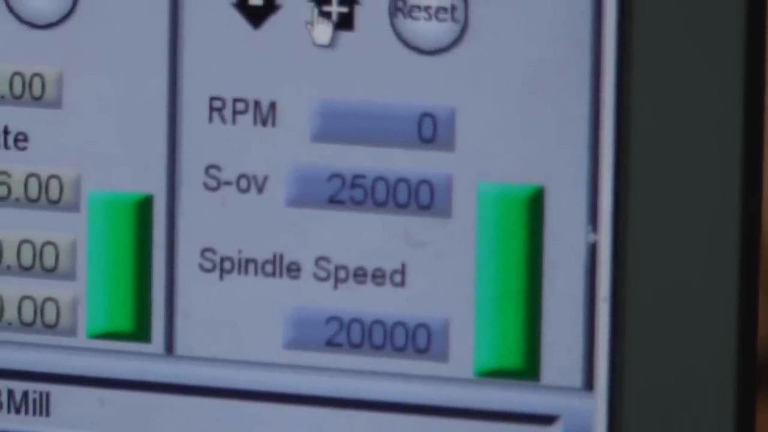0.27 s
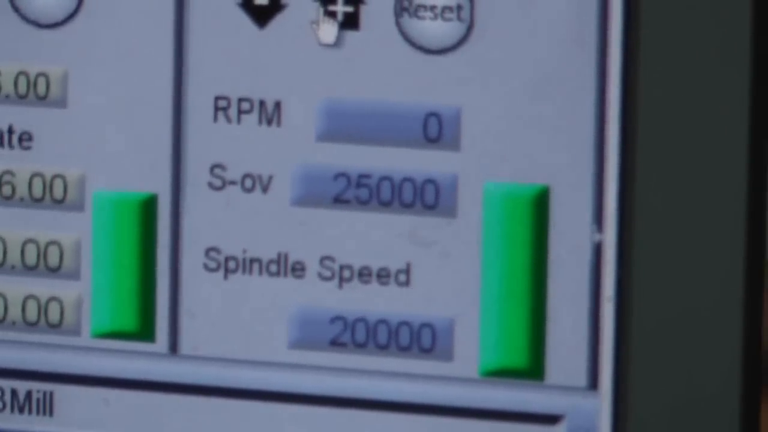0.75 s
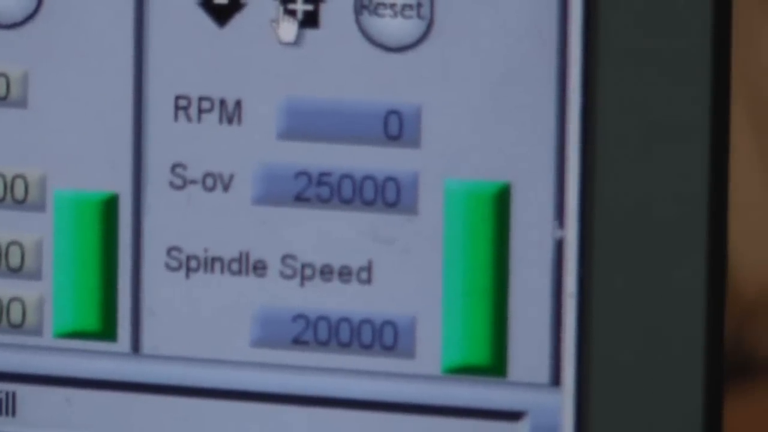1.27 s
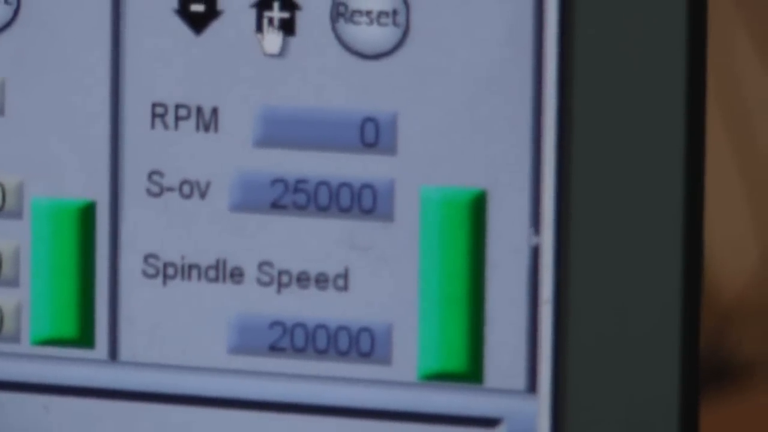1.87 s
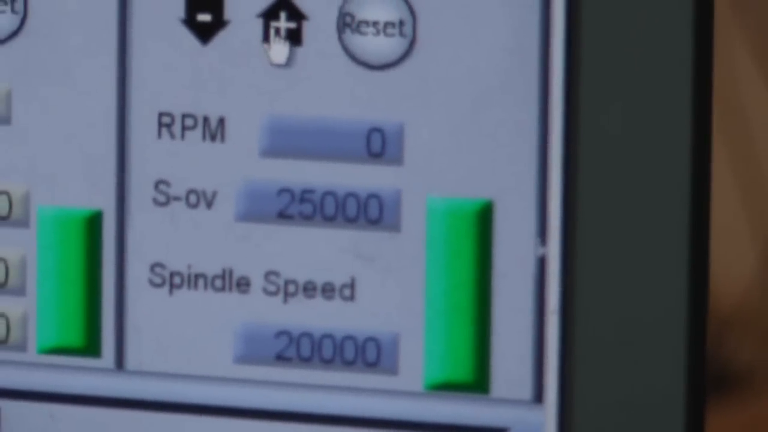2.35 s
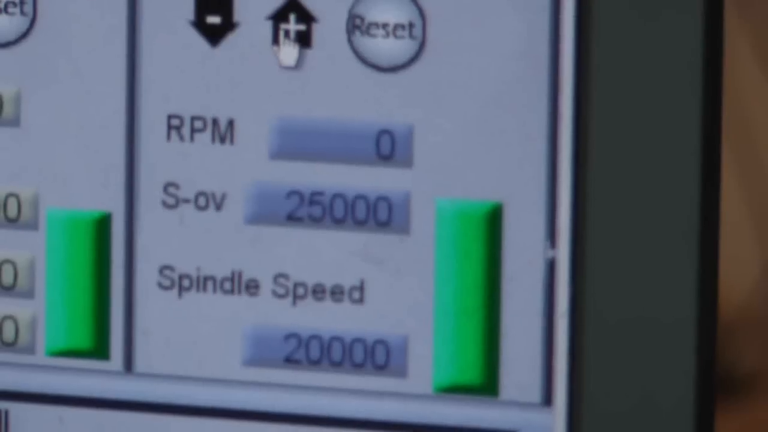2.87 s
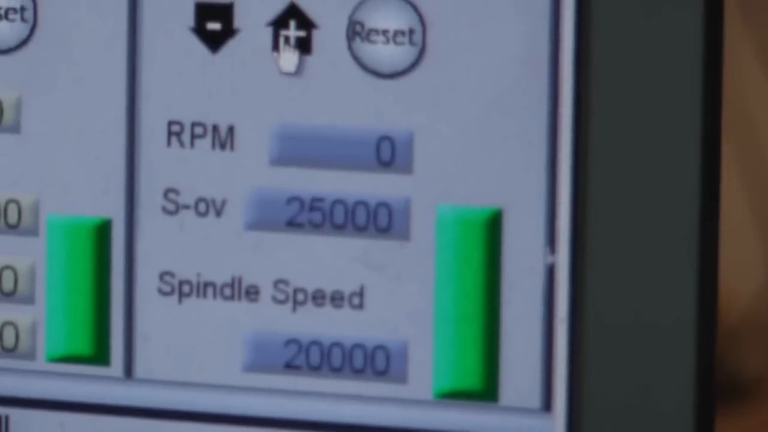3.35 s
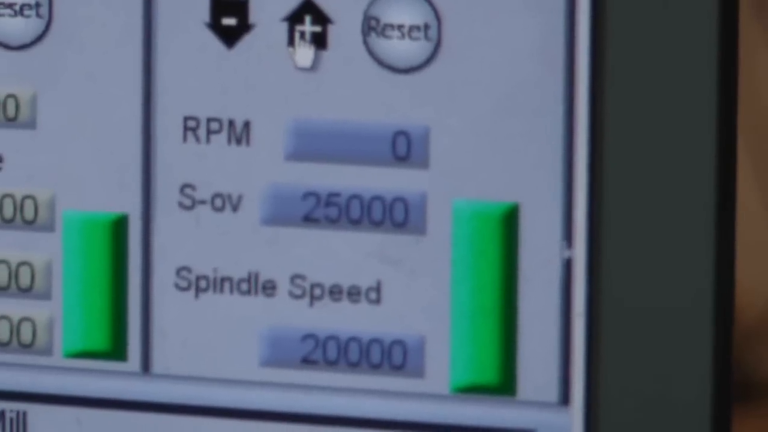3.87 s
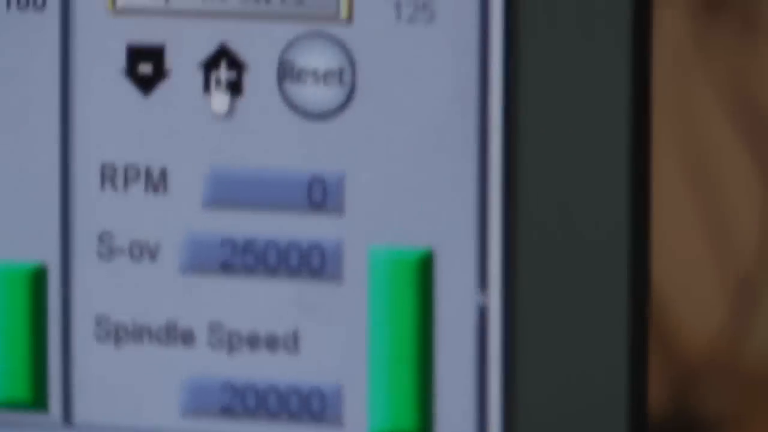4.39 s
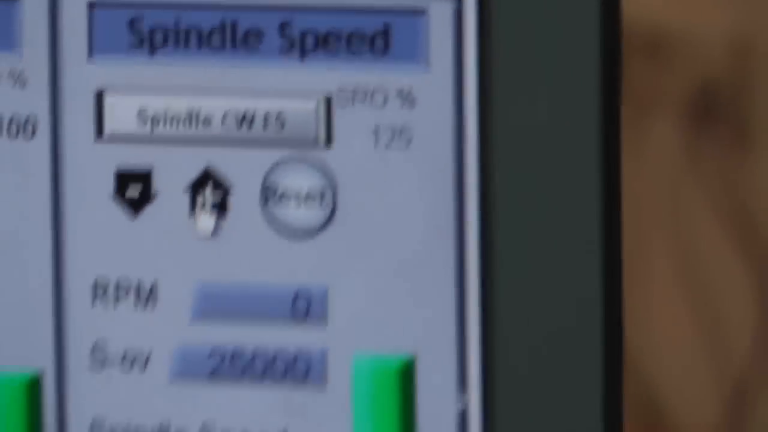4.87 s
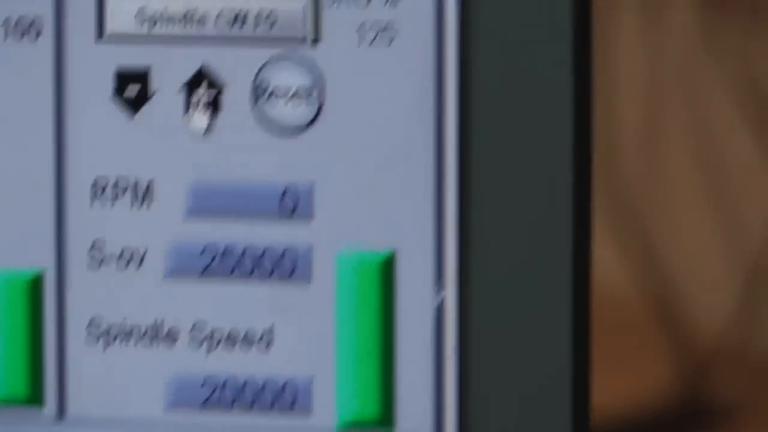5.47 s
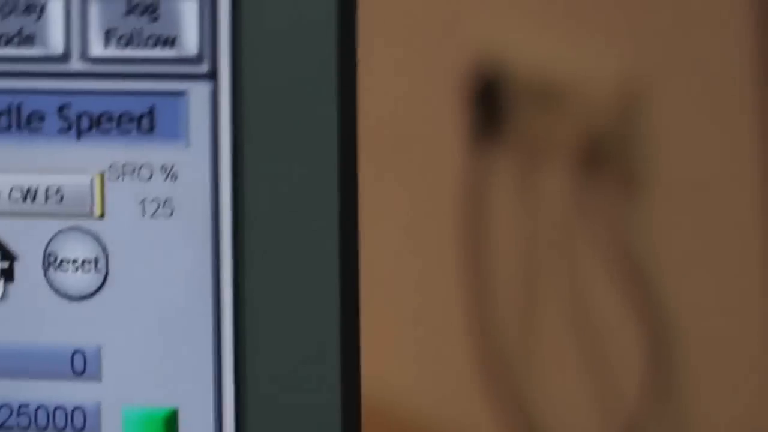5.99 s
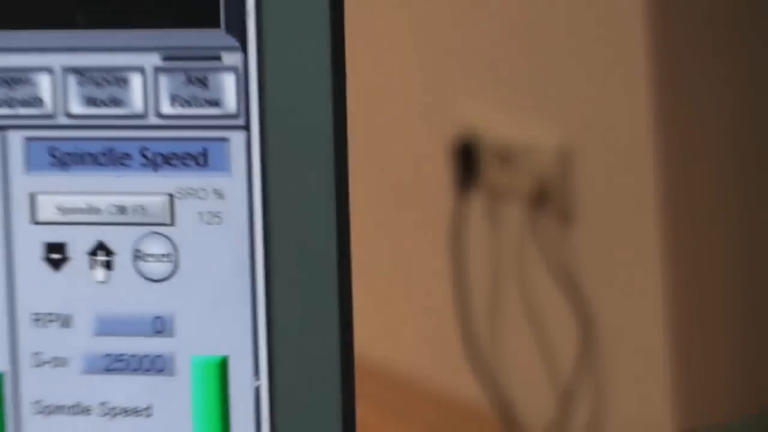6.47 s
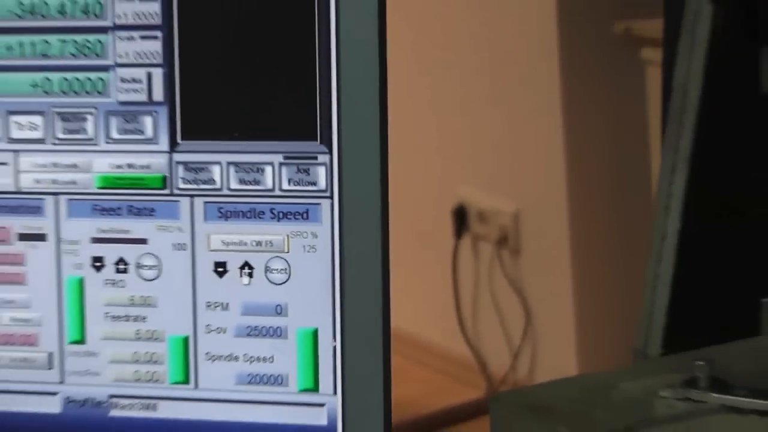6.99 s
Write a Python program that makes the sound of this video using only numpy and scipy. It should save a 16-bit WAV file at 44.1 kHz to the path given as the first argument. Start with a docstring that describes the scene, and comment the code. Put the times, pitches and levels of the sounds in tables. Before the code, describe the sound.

Continuous spindle motor noise in an indoor workshop: a clear whine and its octave rise together, joined by shimmering electrical and bearing tones and a sharp rushing hiss. The climb ends shortly before halfway, and the pitch then stays constant while the octave pulses softly and the balance shifts as the hand-held microphone slowly turns. Faint hum and rumble lie underneath; nothing starts or stops.

```python
"""Router spindle idling in a workshop

The whine climbs at a steady rate as the inverter ramps the magnetic field up, then holds top speed.
Sines at multiples of the shaft, field and ball-bearing rates ride on noise shaped by housing resonances.
Mains hum and a low rumble lie below. A hand-held camera turns slowly, which level and left-right curves
imitate; its gain control ducks everything while the whine swells."""
import sys
import numpy as np
from scipy.fft import rfft, irfft, next_fast_len
from scipy.io import wavfile
from scipy.ndimage import uniform_filter1d, map_coordinates

SR = 44100
rng = np.random.default_rng(int(sys.argv[2]) if len(sys.argv) > 2 else 0)


def transcribe(u):
    """Save the signal u as a 16-bit wav file named by the first command-line argument.

    u: samples, shape (n,) or (channels, n), limited to [-1, 1]; the rate is SR.
    q: integer samples, one column per channel.
    """
    v = np.clip(np.atleast_2d(u).T, -1, 1)
    q = np.round(v * 32767).astype(np.int16)
    wavfile.write(sys.argv[1], SR, q)


N = 318842
TIME = np.arange(N) / SR
STEP = 32  # samples between points of slow curves
COARSE = TIME[::STEP]

# All table levels are relative: trims, wavering and the gain control come on top.
# Spindle speed over time: start_s, field_hz, rotor_slip_hz, ball_passes (per shaft turn)
SPEED_CURVE = [(0, 334.1, .99, 4.0915), (2.5, 384.1, .99, 4.099), (3.29, 399.85, .99, 4.099),
               (3.4, 399.85, .35, 4.099), (3.55, 399.85, .63, 4.0987), (7.23, 399.85, .63, 4.0987)]


def amp(db):
    """Gain of a level in dB."""
    return 10 ** (np.asarray(db) / 20)


def unit(x):
    """Scale a sound to an rms (average strength) of 1."""
    return x / np.sqrt(np.mean(x ** 2))


def along(points, hz):
    """Read a (Hz, value) curve on a logarithmic frequency axis."""
    point_hz, value = np.transpose(points)
    return np.interp(np.log(hz + 1), np.log(point_hz + 1), value)


def curves(rows):
    """One value per sample for each column after the time."""
    time_s, *columns = np.transpose(rows)
    return [np.interp(TIME, time_s, column) for column in columns]


def fine(rows):
    """Bring coarse curves to one value per sample."""
    return np.array([np.interp(TIME, COARSE, row) for row in rows])


def wobble(rate, count=1):
    """Smooth random curves on the coarse time axis, with rate random knots a second."""
    knots = rng.standard_normal((count, int(1000 * N / SR)))
    needed = int(rate * N / SR) + 4
    return np.array([map_coordinates(row[:needed], [COARSE * rate]) for row in knots])


def filtered(x, response):
    """Multiply the spectrum of a sound by a response that depends on frequency."""
    size = next_fast_len(N + SR // 2)
    hz = np.fft.rfftfreq(size, 1 / SR)
    return irfft(rfft(x, size) * response(hz), size)[..., :N]


def panned(x, pan_db):
    """Two channels, the left one louder by pan_db."""
    return x * amp(np.array([pan_db / 2, -pan_db / 2]))


def rush(gain, alike, gate=1):
    """Stereo noise of rms 1: level follows gate, then gain colors it; alike sets left-right likeness."""
    def spread(hz):
        return np.arccos(np.clip(along(alike, hz), -1, 1)) / 2

    def mid_side_gain(hz):
        return gain(hz) * [np.cos(spread(hz)), np.sin(spread(hz))]

    pair = gate * rng.standard_normal((2, N))
    mid, side = filtered(pair, mid_side_gain)
    return unit(np.array([mid + side, mid - side]))


def tone(angle, db, waver_db, blur_db, blur_hz, apart):
    """A sine of wavering level with a skirt of narrow noise; level and phase drift apart left and right."""
    slow, lean, lead = wobble(4, count=3)
    a, b, c, d = amp(blur_db) * wobble(blur_hz, count=4)
    left_skirt = a + 1j * b
    skirt = np.array([left_skirt, 1.42 * left_skirt + .5 * (c + 1j * d)])
    sides = np.array([[1], [-1]])
    level = amp(db + waver_db * (slow + apart * sides * lean))
    size = level * (np.exp(1j * apart * sides * lead) + skirt)
    return np.sqrt(2) * np.real(fine(size) * np.exp(1j * angle))


def angles():
    """Angles of field, shaft and ball passes; the rotor slips behind the field, more while it gains speed."""
    field_hz, slip_hz, ball_passes = curves(SPEED_CURVE)
    shaft_hz = field_hz - slip_hz
    rates_hz = [field_hz, shaft_hz, ball_passes * shaft_hz]
    return 2 * np.pi * np.cumsum(rates_hz, axis=1) / SR


def whine(field, shaft):
    """Unbalance sounds once a turn; twice a turn the shaft tone beats against the field's magnetic pull."""
    # Once-a-turn tone, sweeping through the room's standing waves, then following the camera's turn:
    # start_s, level_db, left_right_db
    turn_curve = [(0.03, -34, -3), (0.13, -39, -1), (0.17, -54, -2.5), (0.23, -38.5, -7.5),
                  (0.35, -33.5, -3), (0.57, -25.5, -6.5), (0.68, -28.5, -4.5), (0.83, -22.5, -1),
                  (0.93, -29, -4), (1.13, -22, -2.0), (1.28, -27, -1.5), (1.46, -28.5, -6.0),
                  (1.54, -25, -2.5), (1.94, -26.5, -1.5), (2.28, -26, -9.0), (2.42, -32, -1.0),
                  (2.48, -49, 4), (2.52, -42, -15), (2.6, -33.5, -10.5), (2.88, -34.5, -11.5),
                  (3.02, -33.5, -6), (3.18, -26, -5.5), (3.47, -30, -4.5), (3.87, -29.5, -4.0),
                  (5.29, -30.5, -3.5), (5.56, -27.5, -1.0), (5.98, -25, -1.5), (6.36, -22.5, -2),
                  (6.88, -22.5, -2.5), (7.18, -22, -3)]
    # Twice-a-turn tone: start_s, shaft_level_db, left_right_db, field_share (field over shaft tone, 0-1)
    octave_curve = [(0, -45, -2, 0.8), (.25, -50, -19, 0.6), (.42, -38.5, 0, 0.5), (.9, -40, -6, .7),
                    (1.3, -34.5, -4, 0.3), (1.55, -33.5, 5, 0.25), (1.85, -27.5, 1, .6),
                    (2.1, -36, 5, 0.56), (2.3, -41.5, -11, .4), (2.6, -34, 3, 0.54),
                    (2.95, -33, -18.5, 0.94), (3.15, -32.5, -9, 0.6), (3.35, -21, -5, 0.2),
                    (3.7, -24, -4.5, 0.53), (5.2, -22, -3, .45), (5.8, -20, -2, .45),
                    (6.3, -22.5, .5, 0.56), (7.23, -21, 0, 0.17)]
    beat_lead = 0.23  # lead of the field tone at the start, in turns
    low_db, low_pan_db = curves(turn_curve)
    octave_db, octave_pan_db, share = curves(octave_curve)
    # Two tones close in pitch act as one whose level and phase follow the beat
    beat = 1 + share * np.exp(1j * (2 * (field - shaft) + 2 * np.pi * beat_lead))
    octave_db = octave_db + 20 * np.log10(np.abs(beat) + 1e-3)
    octave_angle = 2 * shaft + np.angle(beat)
    low = tone(shaft, low_db[::STEP], waver_db=0.14, blur_db=-31.5, blur_hz=70.8, apart=0.28)
    octave = tone(octave_angle, octave_db[::STEP], waver_db=1.37, blur_db=-30.5, blur_hz=89.9, apart=0.14)
    return panned(low, low_pan_db) + panned(octave, octave_pan_db)


def overtones(field, shaft, passes):
    """Thin lines, each wavering on its own as wall echoes make it; low and high ones differ in skirt."""
    # Multiples of shaft speed, .409 being the ball cage and other broken ones likely bearing tones:
    # shaft_multiple, low_speed_db, middle_speed_db, top_speed_db
    shaft_lines = [(0.409, -55, -59, -65), (2.665, -52, -60, -68), (2.96, -46, -56, -66),
                   (3, -39, -43, -42), (3.667, -66, -54, -49), (4, -41, -39, -41), (4.77, -49, -63, -68),
                   (5, -45, -53, -53), (6, -57, -59, -53), (7, -59, -58, -55), (9, -57, -49, -57),
                   (16, -38, -44, -49), (18, -48, -51, -50), (31.5, -61, -51, -53), (34, -49, -50, -58)]
    # Inverter tones: field_multiple, low_speed_db, middle_speed_db, top_speed_db
    field_lines = [(11, -36, -41, -43), (13, -43, -42, -42), (14, -47, -45, -47), (15, -50, -48, -53),
                   (16, -50, -55, -56), (17, -46, -55, -53), (19, -66, -50, -57), (20, -47, -46, -58),
                   (22, -41, -50, -52), (23, -48, -56, -58), (24, -47, -52, -54), (25, -54, -47, -57),
                   (26, -43, -45, -50), (28, -42, -60, -57), (29, -58, -55, -56), (32, -47, -63, -56),
                   (35, -50, -54, -63), (37, -57, -55, -68), (39, -53, -63, -68), (41, -54, -63, -70),
                   (46, -59, -70, -70)]
    # Balls passing a spot on the race, with sidebands a turn apart:
    # ball_passes, shaft_turns, low_speed_db, middle_speed_db, top_speed_db
    ball_lines = [(1, -2, -52, -49, -48), (1, -1, -48, -51, -52), (1, 0, -47, -43, -39),
                  (1, 1, -44, -51, -65), (1, 2, -57, -63, -53), (1, 3, -71, -57, -48),
                  (-1, 7, -40, -50, -60), (-1, 8, -49, -46, -51), (-1, 9, -41, -50, -60),
                  (2, 0, -48, -34, -40), (2, 1, -44, -47, -58), (2, 2, -41, -46, -56),
                  (-2, 18, -51, -48, -47), (-2, 19, -48, -45, -53), (3, 0, -39, -37, -46),
                  (3, -1, -46, -50, -47), (3, 1, -53, -48, -50), (5, 0, -45, -45, -44),
                  (5, -1, -57, -57, -51), (5, 1, -49, -50, -64), (6, 0, -48, -51, -54),
                  (8, 0, -66, -45, -51)]
    # Sixteen rotor bars passing, shifted by the field:
    # field_multiple, low_speed_db, middle_speed_db, top_speed_db
    bar_lines = [(3, -64, -52, -59), (4, -54, -61, -66), (6, -58, -53, -57), (11, -53, -55, -64),
                 (12, -46, -61, -66), (15, -57, -53, -56)]
    # Field speeds for the three level columns: low_hz, middle_hz, top_hz
    speeds_hz = [343, 376, 399.5]
    # Housing resonances that lift a line crossing them: center_hz, width_hz, lift_db
    singing = [(4385, 87, 7.5), (5674, 78, 3.5), (7800, 190, 5.5)]

    lines = [(k * shaft, db) for k, *db in shaft_lines]
    lines += [(k * field, db) for k, *db in field_lines]
    lines += [(balls * passes + turns * shaft, db) for balls, turns, *db in ball_lines]
    lines += [(16 * shaft + k * field, db) for k, *db in bar_lines]
    low, high = np.zeros((2, 2, N))
    field_hz = curves(SPEED_CURVE)[0][::STEP]
    depth = np.where(field_hz < speeds_hz[-1], 2.76, 1)  # deeper wavering below top speed
    for angle, db in lines:
        hz = field_hz * angle[-1] / field[-1]
        lift_db = sum(top_db * np.exp(-.5 * ((hz - center) / width) ** 2) for center, width, top_db in singing)
        level_db = np.interp(field_hz, speeds_hz, db) + lift_db
        angle = angle + 2 * np.pi * rng.random()  # random starting phase
        if angle[-1] < 5.5 * shaft[-1]:
            low += tone(angle, level_db + 0.25, waver_db=1.17 * depth, blur_db=-16, blur_hz=99.7, apart=0.42)
        else:
            high += tone(angle, level_db - 0.3, waver_db=1.07 * depth, blur_db=-12.5, blur_hz=30.03, apart=0.054)
    return panned(low, np.full(N, -3.5)) + panned(high, np.full(N, -1.1))


def hiss(shaft):
    """Rolling bearing noise, pulsing once a turn and fluttering at random, rings in the housing."""
    # Bearing hiss over time: start_s, level_db, left_right_db, treble_db
    hiss_curve = [(0, -28.5, -0.5, -7), (2.78, -28, -1, -6), (3.6, -30, -0.5, -5.5), (5.1, -30, -0.5, -4.5),
                  (5.8, -30.5, -0.5, -5), (6.5, -30, -1, -3.5), (7.23, -30.5, -1, -3.5)]
    # Housing resonances: center_hz, width_hz, level_db
    housing = [(930, 38, -7), (1445, 174, -5), (1673, 210, -1.5), (3097, 303, -1.5), (3542, 140, 0.5),
               (3880, 340, -0.5), (4350, 230, 0), (4600, 130, -0.5), (5330, 350, -14), (8000, 590, -3),
               (9520, 600, -7), (11900, 1860, -5.5)]
    # Broad hiss between the resonances: frequency_hz, level_db (per Hz)
    broad = [(300, -36), (400, -18.5), (700, -15), (1050, -14.5), (1270, -40), (1900, -18), (2250, -17),
             (2550, -17.5), (3000, -2.5), (6000, -12.5), (13000, -12), (15700, -17)]
    # How alike left and right are: frequency_hz, likeness (1 = the same)
    likeness = [(300, 0.59), (640, 0.68), (1400, 0.92), (2500, 0.82), (3500, 0.96), (8000, 1),
                (11000, 0.96), (15000, 0.55)]
    # Left-right balance by pitch: frequency_hz, left_right_db
    balance = [(400, -6.5), (1400, 1), (3500, -0.8), (8000, 2.3), (13000, -1.5)]

    def modes(hz):
        return sum(amp(db) ** 2 * (hz * width) ** 2 / ((center * center - hz * hz) ** 2 + (hz * width) ** 2)
                   for center, width, db in housing)

    def gain(hz):
        # Squared mode curve: narrow resonances standing out of the hiss
        return np.sqrt(modes(hz + 1) ** 2 + amp(along(broad, hz)) ** 2)

    level_db, pan_db, treble_db = curves(hiss_curve)
    flutter_db = fine(0.61 * wobble(10) + 0.77 * wobble(60))
    gate = (1 + 0.12 * np.cos(shaft)) * amp(flutter_db)
    noise = rush(gain, likeness, gate)
    noise = filtered(noise, lambda hz: amp(along(balance, hz) * np.array([[.5], [-.5]])))
    # Treble beams forward, so its level follows the camera's aim
    treble = filtered(noise, lambda hz: 1 / (1 + (6500 / (hz + 1)) ** 8))
    rebalanced = noise - treble + amp(treble_db + 6.0) * treble
    return panned(amp(level_db + 1.57) * rebalanced, pan_db)


def workshop():
    """Mains hum, a slightly wavering sine, over a low noise rumble that differs left and right."""
    # Mains hum: pitch_hz, level_db
    hum_hz, hum_db = (99.9, -61)
    # Room rumble: frequency_hz, level_db (per Hz)
    rumble_color = [(30, -9), (70, -5), (120, -4), (200, 0), (300, -5.5), (600, 2.5), (1500, -45)]
    rumble_likeness = [(40, -.7), (100, -0.31), (160, 0.14), (300, 0.76)]  # frequency_hz, likeness
    hum_level = amp(hum_db + fine(.4 * wobble(6)))
    side_phase = np.array([[.3], [-.3]])  # radians, left and right
    hum = hum_level * np.sqrt(2) * np.sin(2 * np.pi * hum_hz * TIME + side_phase)
    rumble = rush(lambda hz: amp(along(rumble_color, hz)), rumble_likeness)
    return panned(hum, np.full(N, -2.2)) + panned(amp(-54.0) * rumble, np.full(N, -1.1))


def scene():
    """Spindle sounds, all driven by the same turning angles, plus the room."""
    field, shaft, passes = angles()
    return whine(field, shaft) + overtones(field, shaft, passes) + hiss(shaft) + workshop()


def record(dry):
    """Gain control halves the level swings in dB, ducking swells; nothing passes above the band limit."""
    top_hz = 15750
    power = np.abs(uniform_filter1d(np.mean(dry ** 2, axis=0), int(.15 * SR)))  # mean over 0.15 s
    gain_db = -.5 * (10 * np.log10(power + 1e-12) + 20.63)  # no change at -20.63 dB
    return filtered(dry * amp(gain_db), lambda hz: hz < top_hz)


dry = scene()
out = record(dry)
transcribe(out)
```